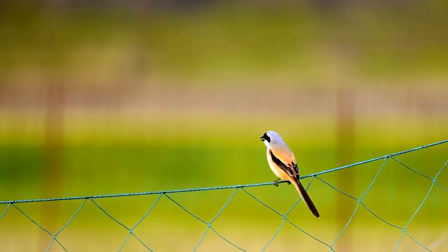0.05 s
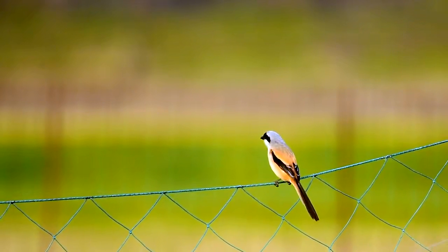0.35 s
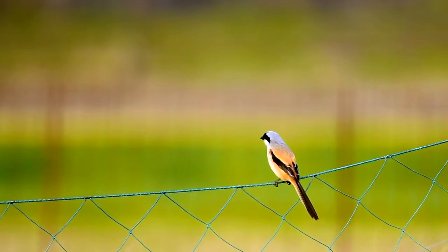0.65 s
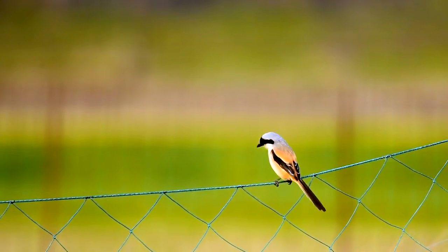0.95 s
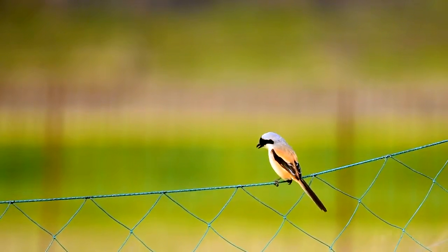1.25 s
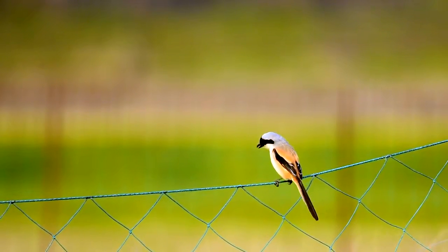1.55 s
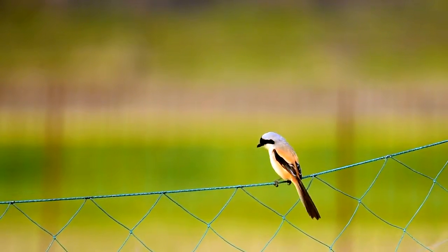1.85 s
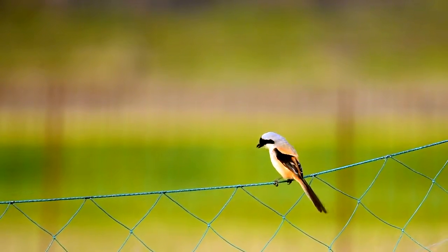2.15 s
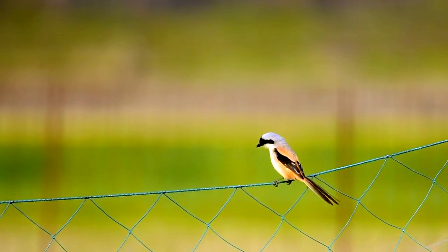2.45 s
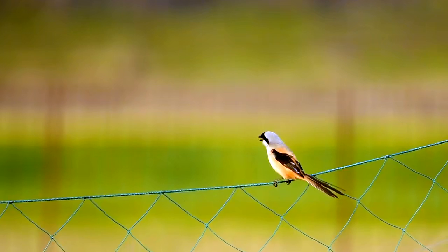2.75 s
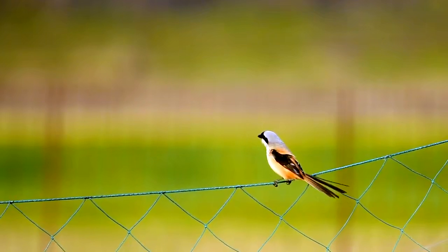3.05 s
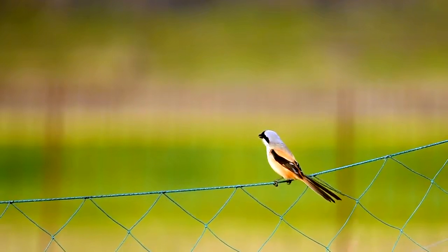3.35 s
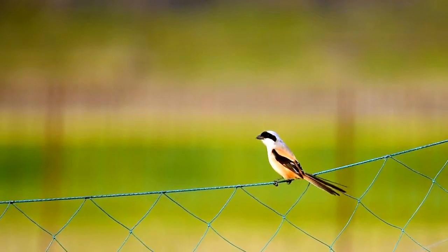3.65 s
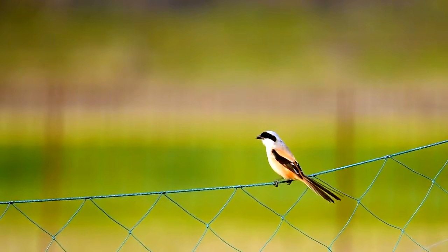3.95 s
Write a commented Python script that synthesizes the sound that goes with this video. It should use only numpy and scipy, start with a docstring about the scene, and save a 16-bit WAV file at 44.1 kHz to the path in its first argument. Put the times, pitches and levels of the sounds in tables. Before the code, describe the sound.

Clear whistles and chirps come from a songbird in the open, with faint birds far off. Low wind gusts thump the microphone on both sides, then ease. Early on, a far bang is followed by rapid camera clicks.

```python
"""A shrike on a fence sings gliding whistles, two-voiced chips and two short buzzes, using both sides
of its syrinx. Other birds answer from far off, over a steady open-air wash. Wind eddies buffet the left
and right microphone ports separately and drop after three seconds. A distant bang rolls away,
and a camera mechanism ticks in a quick burst, a little right of centre."""
import sys
import numpy as np
from scipy import signal
from scipy.fft import rfft, irfft
from scipy.io import wavfile
from scipy.ndimage import uniform_filter1d, map_coordinates

SR = 44100
rng = np.random.default_rng(int(sys.argv[2]) if len(sys.argv) > 2 else 0)


def master(y):
    """Save y as 16-bit WAV."""
    cut = np.clip(np.atleast_2d(y).T, -1, 1)
    pcm = np.round(cut * 32767)  # scale
    wavfile.write(sys.argv[1], SR, pcm.astype(np.int16))


N = 176400

# Levels in the tables are relative: the functions add their own gains.
# Colours of the open air, the bang, a camera tick, the eddies and a buffet breaking up.
# Each row: frequency in Hz, spectral density in dB.
AIR_SPECTRUM = [(15, -33), (25, -0.5), (64, -2.5), (247, -15), (400, -17.5), (851, -17), (1500, -21),
                (1860, -24.5), (2570, -30.5), (3650, -29), (6420, -34.5), (9110, -27.5), (15600, -44)]
BANG_SPECTRUM = [(100, -37), (500, -4), (1100, 4.5), (1900, -5.5), (2600, -15), (4200, -17), (5500, -25),
                 (15000, -36)]
TICK_SPECTRUM = [(500, -20), (1200, -9), (2300, 7.5), (3200, -19), (5000, 2), (6500, -13), (8000, -3),
                 (9200, 8), (10200, -2.5), (11200, -9), (12500, -10), (14400, -6), (16000, -18)]
EDDY_SPECTRUM = [(15, -43), (30, -8), (65, 2.5), (150, 3), (300, -8.5), (500, -20.5), (800, -38),
                 (1400, -52), (3000, -60), (16000, -89)]
CRUNCH_SPECTRUM = [(100, -27), (600, 3.5), (1200, 5), (2500, -10.5), (5000, -25), (9000, -29), (16000, -48)]
# How alike the air is at the two ports. Each row: frequency in Hz, correlation from 0 to 1.
AIR_LIKENESS = [(30, 0.57), (500, 0.73), (1500, 0), (4000, 0), (9000, 0.15), (16000, 0)]
# Slow swell of the background. Each row: time in seconds, level in dB.
AIR_LEVEL = [(0, 3), (1.2, 1.5), (1.7, 4), (2.3, 0.5), (3.2, 1), (4, .5)]
# Decay of the bang's first burst. Each row: frequency in Hz, seconds to fall 60 dB.
BANG_DECAY = [(200, 0.22), (1500, 0.42), (5000, 0.43)]
# Wind strength at each port. Each row: time in seconds, level in dB.
GUSTS_LEFT = [(0.0, -15.5), (0.19, -18.5), (0.28, -3.0), (0.33, -23.0), (0.42, -16.0), (0.51, -19.5),
              (0.54, -11.5), (0.67, -17.5), (0.7, -26.0), (0.84, -26.5), (0.9, -33.5), (0.93, -24.5),
              (0.99, -31.5), (1.02, -21.0), (1.09, -26.0), (1.18, -17.5), (1.21, -28.0), (1.26, -18.5),
              (1.44, -18.0), (1.48, -11.5), (1.57, -23.0), (1.63, -38.5), (1.68, -35.0), (1.72, -47.0),
              (1.8, -21.0), (1.98, -10.0), (2.14, -16.5), (2.21, -30.5), (2.26, -19), (2.45, -26.0),
              (2.48, -18.0), (2.56, -27.0), (2.66, -13.5), (2.72, -24.0), (2.81, -22.0), (2.89, -40.0),
              (2.92, -29), (2.99, -42.5), (3.07, -31), (3.11, -47.0), (3.44, -45.0), (3.61, -51.0),
              (3.7, -39), (4.0, -43.5)]
GUSTS_RIGHT = [(0, -29.5), (.12, -20.5), (.18, -37), (.25, -15.5), (.31, -21), (.34, -12), (.4, -19.5),
               (.43, -9), (.48, -39), (.63, -24), (.71, -32), (.81, -21), (.86, -41), (.9, -27.5),
               (.97, -32.5), (1.005, -15.5), (1.09, -30), (1.36, -36), (1.53, -20.5), (1.65, -40),
               (1.67, -20), (1.745, -31), (1.82, -18), (1.87, -36.5), (1.945, -10.5), (2.02, -34),
               (2.07, -17), (2.11, -26), (2.15, -13), (2.2, -32), (2.28, -18), (2.38, -14.5), (2.42, -24.5),
               (2.6, -29.5), (2.63, -21.5), (2.77, -24.5), (2.84, -43.5), (2.87, -32), (2.98, -41.5),
               (3.04, -30), (3.11, -52), (3.35, -46), (3.45, -63), (4, -44)]
# Pace of the eddies, apart from their strength. Each row: time in seconds, speed factor.
EDDY_PACE = [(0.149, 0.87), (.28, 1.224), (.35, 1.018), (.6, 1.15), (1, 0.83), (1.27, .95), (1.44, 1.473),
             (1.6, 0.83), (1.881, 1.25), (2.071, 0.75), (2.15, 1.063), (2.5, .85), (2.66, .76)]
# Single hard buffets. Each row: time in seconds, level in dB, width in seconds, port (0 left, 1 right).
VORTEX_HITS = [(0.198, -4, 0.0011, 0), (0.256, 3.5, 0.00096, 0), (.269, 1, 0.00073, 0),
               (.276, 2, 0.0005, 0), (.283, 7, 0.00057, 0), (0.289, 4, 0.0007, 0), (0.432, -9.5, 0.0011, 1),
               (0.531, 3, 0.0011, 0), (.55, 0.5, 0.0009, 0), (.63, -6, 0.0011, 0), (.663, -1.5, 0.00098, 0),
               (1.111, -4, 0.0016, 0), (1.405, -9, 0.00081, 0), (1.489, -3.5, 0.00059, 0),
               (1.873, -6, 0.00078, 0), (1.936, 2.5, 0.00067, 1), (2.002, 4.5, 0.00087, 0),
               (2.152, -3.5, 0.00096, 1), (2.278, -8, 0.0014, 1), (2.447, -1.5, 0.00078, 1),
               (2.914, -15, 0.0017, 0), (3.065, -13.5, 0.0021, 0)]
# A far bird's run of dipping notes.
# Each row: start in seconds, length in seconds, first pitch in Hz, lowest pitch in Hz, level in dB.
FAR_TWITTER = [(3.84, 0.024, 3165, 2526, -51), (3.86, 0.022, 2980, 2330, -55.5),
               (3.903, 0.021, 2360, 2153, -51.5), (3.93, 0.017, 2620, 2300, -60),
               (3.96, .018, 2540, 2210, -54), (3.99, .02, 2380, 2250, -51)]
# Bird notes, one curve per note. Each row: time in seconds, pitch in Hz, level in dB.
FAR_NOTES = [
    [(.142, 1326, -47.5), (.17, 1422, -52.5), (.245, 1352, -46)],
    [(.595, 1533, -52), (.64, 1507, -57)],
    [(3.13, 1862, -56), (3.2, 1875, -56), (3.345, 1772, -56)],
    [(3.82, 5100, -64), (3.845, 4998, -61), (3.865, 5400, -66)],
    [(3.868, 4676, -62.5), (3.895, 4490, -60), (3.925, 3800, -61)],
]
FARTHEST_NOTES = [
    [(2.03, 3700, -65), (2.23, 3580, -65)],
    [(2.29, 4228, -59), (2.66, 4160, -67)],
    [(3.15, 4373, -58), (3.2, 5225, -63)],
]
SHRIKE_WHISTLES = [
    [(0.0, 5020, -45), (0.026, 4830, -43.5), (0.054, 5220, -52), (.066, 4950, -49), (0.102, 4741, -52),
     (0.12, 4300, -60)],
    [(0.2, 5450, -69), (0.228, 5553, -56), (0.264, 5550, -53.5), (0.35, 4560, -47), (0.366, 4250, -51),
     (0.39, 3420, -48), (0.416, 3105, -43), (0.456, 2940, -46), (0.475, 2680, -59)],
    [(1.352, 4231, -68), (1.371, 4430, -49), (1.381, 4240, -49.5), (1.44, 4480, -41.5), (1.476, 4900, -43),
     (1.538, 4725, -40.5), (1.57, 4430, -47), (1.588, 4080, -55)],
    [(1.67, 4300, -52), (1.694, 4380, -48), (1.724, 4904, -51), (1.734, 5320, -51), (1.75, 4790, -48),
     (1.778, 5075, -48.5), (1.8, 4530, -42.5), (1.814, 3970, -40), (1.874, 3230, -39.5),
     (1.95, 2445, -47.5), (1.965, 2506, -58)],
    [(2.745, 5687, -59.5), (2.755, 5015, -40), (2.787, 3085, -42.5), (2.797, 3050, -45.5),
     (2.821, 3410, -36.5), (2.85, 3410, -56)],
    [(2.942, 4711, -55), (2.952, 4550, -42.5), (2.968, 4530, -38.5), (2.988, 4069, -45.5),
     (3.002, 3310, -37.5), (3.026, 2790, -55)],
    [(3.483, 2203, -64.5), (3.493, 2360, -56), (3.511, 2510, -50), (3.589, 3445, -44.5), (3.639, 3700, -51),
     (3.679, 3745, -42.5), (3.718, 3740, -43.5), (3.734, 3600, -61)],
]
SHRIKE_UNDERTONES = [
    [(2.352, 4600, -60.5), (2.364, 4567, -58), (2.374, 4140, -50.5)],
    [(2.475, 5290, -61), (2.483, 4596, -53), (2.492, 4470, -60)],
    [(2.738, 4550, -56), (2.768, 4580, -43), (2.782, 4367, -49)],
    [(2.961, 6920, -57), (2.975, 5764, -53), (2.992, 4143, -45)],
]  # the second side of the syrinx, and soft chips
SHRIKE_BUZZES = [
    [(.94, 4380, -63), (.972, 4270, -49.5), (.996, 3950, -51), (1.006, 2700, -47)],
    [(1.038, 4400, -50), (1.055, 4500, -44), (1.068, 4700, -43.5), (1.081, 4550, -37), (1.09, 3970, -43.5),
     (1.096, 2900, -59)],
]

TIME, BIN_HZ = np.arange(N) / SR, np.fft.rfftfreq(N, 1 / SR)


def amp(db):
    """Decibels to gain."""
    return 10 ** (np.asarray(db) / 20)


def unit_rms(x):
    """Scales to rms 1."""
    return x / np.sqrt(np.mean(x ** 2) + 1e-20)


def over_time(table):
    """A table's value at every sample."""
    return np.interp(TIME, *np.transpose(table))


def at_hz(table, hz):
    """Reads a table on a log-frequency axis."""
    table_hz, value = np.transpose(table)
    return np.interp(np.log(hz + 1), np.log(table_hz + 1), value)


def noise(spectrum, channels=2):
    """Unrelated noises of one colour."""
    white = rfft(rng.standard_normal((channels, N)))
    return unit_rms(irfft(white * amp(at_hz(spectrum, BIN_HZ)), N))


def drift(rate_hz, size=N):
    """A smooth random wander of rms 1."""
    lowpass = np.exp(-(np.fft.rfftfreq(size, 1 / SR) / rate_hz) ** 2)
    return unit_rms(irfft(rfft(rng.standard_normal(size)) * lowpass, size))


def pan(x, left_db):
    """Sets the left channel left_db above the right; negative values lean right."""
    return x * amp([[left_db / 2], [-left_db / 2]])


def field_echoes(x, t60_s=0.21, echoes_per_s=2000):
    """Thin scattered echoes from ground, fence and bushes."""
    t = np.arange(SR) / SR
    echoes = rng.standard_normal((2, SR)) * (rng.random((2, SR)) < echoes_per_s / SR)
    tail = echoes * amp(-60 * t / t60_s) * (t > .005)
    return signal.fftconvolve(x[None], tail / np.linalg.norm(tail[0]), axes=1)[:, :N]


def syrinx_note(curve, rasp, overtone_db=-24.5, swing_hz=0, flutter=0):
    """A gliding tone, purer when soft, hoarse in fast slurs; swing shakes its pitch, flutter its level."""
    edge_s, buzz_hz, slur_hz_per_s, full_voice_db = 0.0048, 180, 110000, -40
    jitter, shimmer_db, rasp_width_hz = 0.0045, 1.7, 1150
    times, pitches, levels = np.transpose(curve)
    start, end = times[0], times[-1]
    t = np.arange(round(start * SR) - 400, round(end * SR) + 400) / SR
    def waver(rate_hz):
        return drift(rate_hz, size=32768)[:len(t)]
    glide = uniform_filter1d(np.interp(t, times, pitches), size=220)
    shake = np.sin(2 * np.pi * buzz_hz * t)
    swing_fade = np.clip((end - t) / (end - start) * 2, 0, 1)
    tremble_depth_hz = 80 * np.exp(-((glide - 4900) / 320) ** 2)  # the voice trembles near 4900 Hz
    tremble = tremble_depth_hz * np.sin(2 * np.pi * 112 * t + waver(32))
    pitch = glide * (1 + jitter * waver(180)) + tremble + swing_hz * shake * swing_fade
    tone = np.exp(2j * np.pi * np.cumsum(pitch) / SR)
    db = np.interp(t, times, levels)
    overtone = amp(overtone_db + np.minimum(db - full_voice_db, 0)) * tone ** 2
    hoarseness = rasp + 0.35 * np.tanh(abs(np.gradient(glide)) * SR / slur_hz_per_s)
    rasp_noise = (waver(rasp_width_hz) + 1j * waver(rasp_width_hz)) / np.sqrt(2)
    roughness = (1 + hoarseness * rasp_noise) / np.hypot(1, hoarseness)
    gate = np.clip(np.minimum(t - start, end - t) / edge_s + .5, 0, 1)
    level = gate * amp(db + shimmer_db * waver(150)) * (1 + flutter * shake)
    voice = np.sqrt(2) * level * (roughness * (tone + overtone)).real
    return np.interp(TIME, t, voice, left=0, right=0)


def open_air(gain_db=-46):
    """Steady distant wash and microphone hiss, most alike at the two ports in the lows."""
    left, unrelated = rfft(noise(AIR_SPECTRUM))
    likeness = at_hz(AIR_LIKENESS, BIN_HZ)
    right = likeness * left + np.sqrt(1 - likeness ** 2) * unrelated
    wash = irfft(np.array([left, right]), N)
    return pan(wash, left_db=-.5) * amp(gain_db + over_time(AIR_LEVEL))


def distant_bang(start_s=.73, rise_s=0.0023, gain_db=-32, roll_db=-11.5, roll_t60_s=4):
    """A far bang reaches the microphone as a diffuse burst and a long faint roll."""
    hz, t, spectrogram = signal.stft(noise(BANG_SPECTRUM), SR, nperseg=512)
    age = np.maximum(t - start_s, 0)
    burst = amp(-60 * age / at_hz(BANG_DECAY, hz)[:, None])
    roll = amp(roll_db - 60 * age / roll_t60_s)
    bang = signal.istft(spectrogram * np.hypot(burst, roll), SR, nperseg=512)[1][:, :N]
    return amp(gain_db) * bang * np.clip((TIME - start_s) / rise_s, 0, 1)


def far_birds(gain_db=-3, echo_db=-2.5):
    """Faint calls from across the field; the farthest birds arrive only as echoes."""
    dips = [[(start, top, db - 2), (start + length / 2, (top + 2 * low) / 3, db),
             (start + length, low, db - 5)] for start, length, top, low, db in FAR_TWITTER]
    calls = amp(gain_db) * sum(syrinx_note(curve, rasp=0.1, overtone_db=-26) for curve in FAR_NOTES + dips)
    farthest = sum(syrinx_note(curve, rasp=.6, swing_hz=129.6) for curve in FARTHEST_NOTES)
    return calls + field_echoes(amp(echo_db) * calls + farthest)


def camera_ticks(start_s=1.4525, cycle_s=.0995, cycles=7, gain_db=-34.5):
    """A small mechanism winds up before each tick: a soft click, then a loud double click, every cycle."""
    loud_after_s, pair_gap_s, soft_db = .0425, .005, -5.5
    windup_lead_s, windup_db = 0.013, -13.5
    def burst(onset, decay_s=0.0016):
        return (TIME >= onset) * np.exp(-np.maximum(TIME - onset, 0) / decay_s)
    envelope = np.zeros(N)
    for soft_at in start_s + cycle_s * np.arange(cycles):
        loud_at = soft_at + loud_after_s
        clicks = amp(soft_db) * burst(soft_at) + burst(loud_at) + burst(loud_at + pair_gap_s)
        windup = sum(burst(onset - windup_lead_s, decay_s=0.011) for onset in (soft_at, loud_at))
        envelope += clicks + amp(windup_db) * windup
    return pan(noise(TICK_SPECTRUM) * envelope * amp(gain_db), left_db=-3)


def port_wind(gusts, gain_db=-.5, lump_db=5.5, speed_per_db=0.0237, reference_db=-19):
    """Eddies cross one microphone port: the stronger the gust, the faster and brighter they pass."""
    db = over_time(gusts) + lump_db * np.clip(drift(rate_hz=48), -2, .7)  # rounded lumps, deep lulls
    speed = over_time(EDDY_PACE) * np.exp(speed_per_db * np.maximum(db - reference_db, -16))
    eddies = noise(EDDY_SPECTRUM, channels=1)[0]
    local_rms = np.sqrt(uniform_filter1d(uniform_filter1d(eddies ** 2, size=800), size=500))
    return amp(gain_db + db) * map_coordinates(eddies / local_rms, [np.cumsum(speed)], mode="wrap")


def buffets(crunch_db=-32, crunch_decay_s=0.0039):
    """A vortex strikes a port: one quick pull and push of pressure; the strongest break up in a crunch."""
    ports = np.zeros((2, N))
    crunch = noise(CRUNCH_SPECTRUM, channels=1)[0]
    for hit_s, db, width_s, port in VORTEX_HITS:
        age = TIME - hit_s
        passage = age / width_s
        pressure = amp(db) * 2 * passage / (1 + passage ** 2 / 2) ** 2.55
        breakup = amp(crunch_db + 2 * db) * (age > 0) * np.exp(-abs(age) / crunch_decay_s)
        ports[int(port)] += pressure + breakup * crunch
    return ports


def shrike(gain_db=1, left_lag_s=.000008, echo_db=-12):
    """Whistles, chips and buzzes from one perch on the fence, mostly direct sound, near the centre."""
    whistles = sum(syrinx_note(curve, rasp=0.058) for curve in SHRIKE_WHISTLES + SHRIKE_UNDERTONES)
    buzzes = sum(syrinx_note(curve, rasp=.6, overtone_db=-14, swing_hz=385, flutter=0.21)
                 for curve in SHRIKE_BUZZES)
    song = amp(gain_db) * (whistles + buzzes)
    delayed = irfft(rfft(song) * np.exp(-2j * np.pi * BIN_HZ * left_lag_s), N)
    return pan(np.array([delayed, song]), left_db=1.5) + amp(echo_db) * field_echoes(song)


def scene():
    """Everything that reaches the two microphone ports."""
    birds = shrike() + far_birds()
    wind = np.array([port_wind(GUSTS_LEFT), port_wind(GUSTS_RIGHT)]) + buffets()
    return birds + wind + open_air() + distant_bang() + camera_ticks()


def record(dry):
    """The hardest gusts overload the recorder's input; a low-pass then cuts the top of the treble."""
    knee, cutoff_hz = 14, 15800
    clipped = dry / (1 + dry ** knee) ** (1 / knee)
    lowpass = signal.firwin(511, cutoff_hz, window=("kaiser", 9), fs=SR)
    return signal.oaconvolve(clipped, lowpass[None], "same")


dry = scene()
out = record(dry)
master(out)
```